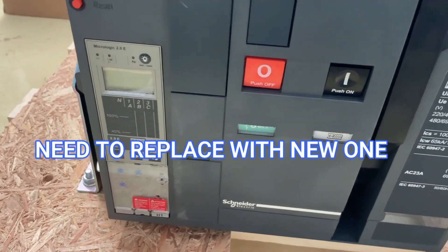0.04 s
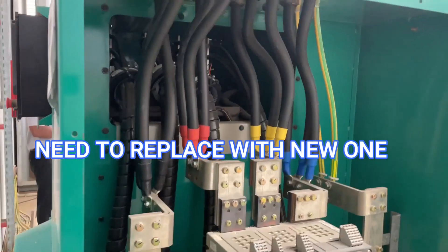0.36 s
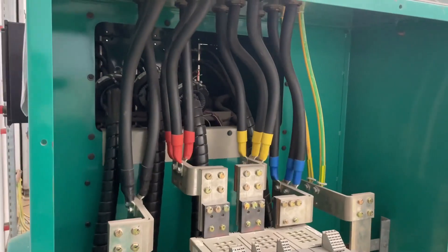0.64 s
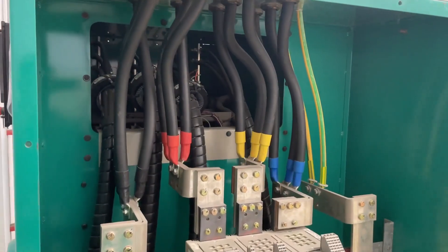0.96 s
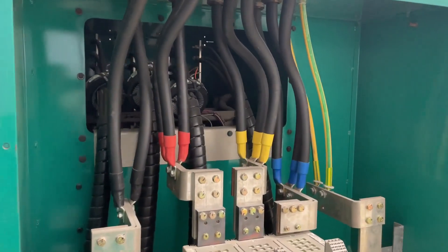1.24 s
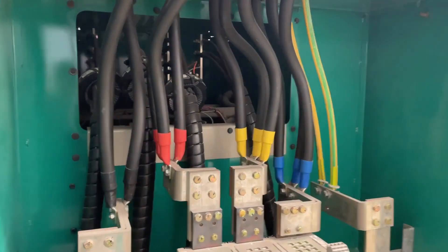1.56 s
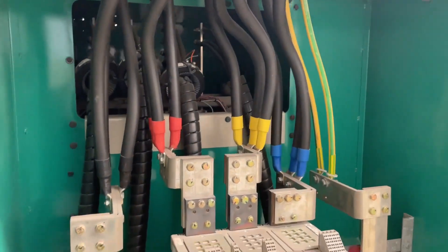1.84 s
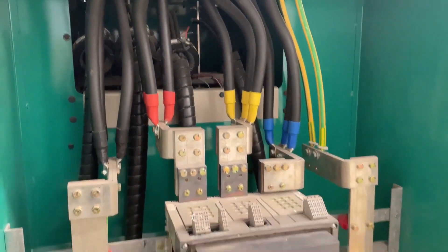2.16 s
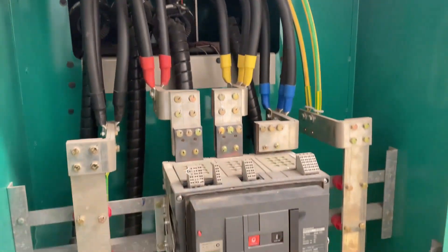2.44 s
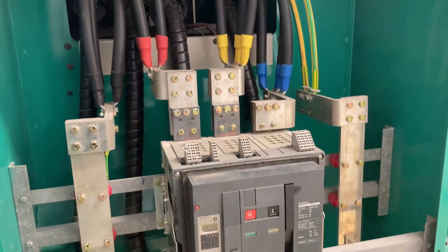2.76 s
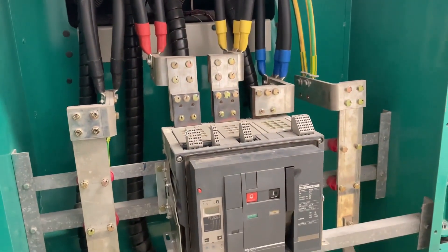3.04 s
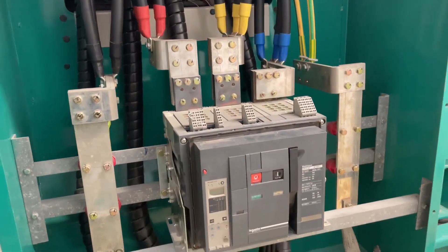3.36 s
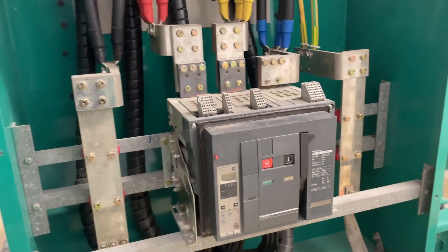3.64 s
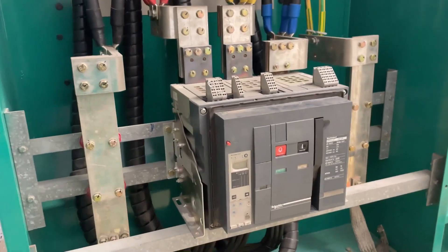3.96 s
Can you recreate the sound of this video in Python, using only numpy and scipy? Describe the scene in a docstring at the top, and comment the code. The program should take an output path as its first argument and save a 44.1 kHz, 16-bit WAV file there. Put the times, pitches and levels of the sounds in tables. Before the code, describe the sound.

A steady drone of fans and wavering motors fills an electrical room, starting after a short, hissing roar and an instant of silence. Faint rubbing swishes pass near the microphone, and a small dull knock comes late.

```python
"""An electrical switch room, with machinery droning behind it: rushing ventilation air, wavering motor tones
and a throbbing rumble. The sound opens briefly on a louder roar with a dying hiss; after a short silence the
scene changes and the drone swells in, bass last. Close to the stereo microphone, friction makes soft swishes,
as of a sleeve, and a small body gives one dull knock."""
import sys
import numpy as np
from scipy import signal
from scipy.fft import rfft, irfft
from scipy.io import wavfile

SR = 44100
rng = np.random.default_rng(int(sys.argv[2]) if len(sys.argv) > 2 else 0)


def dump(signal):
    """Clip the signal to [-1, 1] and save it as 16-bit WAV at the path in sys.argv[1]."""
    limited = np.clip(np.atleast_2d(signal).T, -1, 1)
    pcm = np.round(limited * 32767).astype(np.int16)
    wavfile.write(sys.argv[1], SR, pcm)


N = 176400
TIME = np.arange(N) / SR
HZ = np.maximum(np.arange(N // 2 + 1) * SR / N, 1)
SIDES = np.array([[.5], [-.5]])   # half to the left, minus half to the right
ROAR_END_S, ROAR_FADE_S, DRONE_START_S = 0.284, 0.0038, 0.3299


# Ventilation filling the room. Each row: frequency in Hz, relative level in dB.
AIR_SPECTRUM = [(53, -46), (90, -6.5), (128, -1.5), (169, -6), (294, -2.5), (361, -6), (459, -6.5),
                (503, -9), (542, -6), (594, -10.5), (829, -12), (1320, -16), (1680, -15.5), (2380, -19),
                (2870, -24), (6470, -37.5), (7500, -45.5), (9750, -160), (16500, -120)]
# The air at the microphone. Each row: frequency in Hz, left-right correlation.
AIR_LIKENESS = [(60, 0.84), (98, 1), (160, 0.73), (260, 0.85), (430, 0.53), (690, 0.39), (1130, 0.032),
                (1850, 0.012), (3020, 0.49), (4920, 0.48), (8030, 0.0072), (13100, 0.29)]
# Where the air sits. Each row: frequency in Hz, left minus right in dB.
AIR_BALANCE = [(60, 1.0), (130, -1.5), (280, 1), (600, 1), (1300, 0.5), (2810, 3.5), (6070, 4),
               (13100, -19)]
# Ducts and cabinet. Each row: centre in Hz, width in Hz, lift in dB.
DUCT_RESONANCES = [(264, 27, 3.5), (306, 41, 3), (834, 80, 1), (1089, 99, 5), (1646, 99, 2.5),
                   (1928, 96, 4), (2290, 310, 1.5), (3210, 210, 3), (4490, 720, 3)]

def air():
    """Fan noise through duct and cabinet resonances, fluttering slightly."""
    gain = colour(AIR_SPECTRUM) * from_db(resonances_db(DUCT_RESONANCES) + at_hz(AIR_BALANCE) * SIDES)
    level_db = -20.5 + 0.44 * drift(rate_hz=24)
    return from_db(level_db) * stereo_noise(gain, at_hz(AIR_LIKENESS))


# Motors behind the room. Each row: pitch in Hz, relative level in dB, left-right phase in radians,
# left minus right in dB.
MOTOR_TONES = [(42.7, -32.5, 0, 1), (46.7, -29.5, 0, 1), (53.7, -28, .1, 2), (70.3, -33, -.1, 0),
               (116.5, -34, .1, 0), (140.2, -34, .2, -4.5), (164, -42, .2, 1), (200.3, -37, -.1, 4),
               (231, -37.5, -.1, 3), (246.7, -34.5, -.2, 4), (292, -34, .4, .5), (330, -38, .3, 0),
               (362, -43, -.5, 3), (385, -43, .1, -2), (408, -42, .2, 3), (455, -38.5, .5, 8),
               (537, -41, -.8, 6), (1095, -48, -1.6, 0), (1121, -48, -2.4, 6)]
BASS_TOP_HZ = 80

def motors(low_hz, high_hz):
    """Motor tones of one register waver in level and phase; the lowest beat against each other."""
    out = 0
    for hz, db, apart, pan_db in MOTOR_TONES:
        if low_hz <= hz < high_hz:
            phase = 2 * np.pi * (hz * TIME + rng.random()) + 0.4 * drift(rate_hz=1)
            level_db = db - 1 + pan_db * SIDES + 1.5 * drift(rate_hz=1)
            out = out + np.sqrt(2) * from_db(level_db) * np.sin(phase + apart * SIDES)
    return out


# The machinery's deep shaking. Each row: frequency in Hz, relative level in dB.
RUMBLE_SPECTRUM = [(22, -28), (32, -18), (42, -1), (52, 1), (72, 0.5), (90, -5), (130, -32)]
# Surges of bass in the room. Each row: time in seconds, relative level in dB.
BASS_SURGES = [(.34, -39.5), (.8, -33), (.95, -27), (1.45, -26.5), (1.8, -22.5), (2.3, -24), (2.75, -25),
               (3.05, -25.5), (3.22, -21), (3.42, -24.5), (3.65, -28.5), (3.87, -21.5), (4.0, -25.5)]

def rumble():
    """Shaking and the lowest motor tones surge together, nearly alike on both sides."""
    shaking = from_db(-28 + 1.3 * SIDES) * stereo_noise(colour(RUMBLE_SPECTRUM), likeness=0.97)
    bass = shaking + motors(0, BASS_TOP_HZ)
    level_db = 2 + np.interp(TIME, *np.transpose(BASS_SURGES))
    return from_db(level_db) * bass / bass.std()


# The drone coming in. Each row: register in Hz, starting shortfall in dB, rise time in seconds.
SWELL = [(129, 11.5, 0.94), (415, 10.5, 0.43), (1500, 5, 0.48), (5000, 4, 0.43)]
# Its slow rise and fall above the bass. Each row: time in seconds, gain in dB.
DRONE_LEVEL = [(.33, 0.5), (1.0, -1.54), (1.5, -0.5), (2.2, -0.4), (2.9, 0.3), (3.4, 0.2), (3.8, 0.5),
               (4.0, 0)]

def swell(drone):
    """Each register rises to its full level in its own time."""
    out, spectrum = 0, rfft(drone)
    for hz, shortfall_db, rise_s in SWELL:
        share = at_hz([(row[0], float(row[0] == hz)) for row in SWELL])
        remaining = np.clip(1 - (TIME - DRONE_START_S) / rise_s, 0, 1)
        out = out + irfft(spectrum * share, N) * from_db(-shortfall_db * remaining)
    return out * from_db(np.interp(TIME, *np.transpose(DRONE_LEVEL)))


# The rush of the opening scene. Each row: frequency in Hz, relative level in dB.
ROAR_SPECTRUM = [(26, -33), (45, -5), (75, 0.5), (210, -5), (359, -9.5), (484, -8.5), (810, -17),
                 (1320, -15.5), (1830, -19), (5440, -36), (7500, -50), (9750, -95), (16500, -120)]
# The roar at the microphone. Each row: frequency in Hz, left-right correlation.
ROAR_LIKENESS = [(60, 1), (180, 0.7), (520, 0.36), (1520, 0.079), (4460, 0.45), (13100, -0.22)]
# Its resonances. Each row: centre in Hz, width in Hz, lift in dB.
ROAR_RESONANCES = [(123, 23, 2.5), (178, 25, 4), (319, 36, 3.5), (480, 26, 2.5), (716, 32, 7.5),
                   (960, 140, 2.5), (1366, 100, 4.5), (1630, 126, 6), (2510, 770, 4)]
# Its hum. Each row: pitch in Hz, starting level in dB.
ROAR_HUM = [(86, -20), (122, -22), (180, -22), (214, -20.5), (482, -24)]

def roar(sag_db_per_s=12.5):
    """The brief opening scene: rushing noise and a wavering hum, sagging a little."""
    gain = colour(ROAR_SPECTRUM) * from_db(resonances_db(ROAR_RESONANCES))
    out = from_db(-10) * stereo_noise(gain, at_hz(ROAR_LIKENESS))
    for hz, db in ROAR_HUM:
        phase = 2 * np.pi * (hz * TIME + rng.random()) + .6 * drift(rate_hz=11)
        out = out + np.sqrt(2) * from_db(db + drift(rate_hz=11)) * np.sin(phase)
    return from_db(-sag_db_per_s * TIME) * out


# Swishes close to the microphone. Each row: peak time in seconds, level in dB, rise in seconds,
# decay in seconds, scrape above the swish in dB.
SWISHES = [(0.005, -23, .02, 0.058, -0.5), (0.07, -30, .025, 0.03, 5.5), (0.18, -41.5, 0.035, 0.085, -1),
           (1.095, -43.5, 0.045, 0.083, 5), (1.46, -50, 0.19, .055, 8.5), (1.73, -32.5, 0.013, 0.044, 3),
           (2.5, -54.5, .07, .08, 5), (2.95, -49.5, 0.074, 0.099, 12), (3.15, -47.5, 0.064, 0.065, 5),
           (3.51, -49, .06, 0.1, 13), (3.555, -38, 0.011, 0.04, -5), (3.93, -44.3, 0.045, 0.054, 0)]
# The bright swish and the duller scrape under it. Each row: frequency in Hz, relative level in dB.
SWISH_SPECTRUM = [(3000, -18), (4500, 2.5), (6500, -1), (9000, 4), (12000, -2), (15500, -11)]
SCRAPE_SPECTRUM = [(1200, -6), (2500, 4), (4000, -2), (5800, -3), (7200, -3)]

def swishes(linger=2.2):
    """Bright friction noise over a duller, longer scrape; slow rubs are mostly scrape."""
    bright = strokes([row[:4] for row in SWISHES])
    dull = strokes([(peak_s, db + scrape_db, rise_s, decay_s * linger)
                    for peak_s, db, rise_s, decay_s, scrape_db in SWISHES])
    rub = from_db(.9 * drift(rate_hz=30))   # the friction catches and slips unevenly
    return rub * (bright * treble_noise(SWISH_SPECTRUM) + dull * treble_noise(SCRAPE_SPECTRUM))


# The knock, close by and dead centre. Each row: start in seconds, level in dB.
KNOCK_CONTACTS = [(2.8932, -12), (2.8958, -2.5)]
# The struck body. Each row: pitch in Hz, relative level in dB, seconds to fall by 60 dB.
KNOCK_MODES = [(295, -3, 0.018), (516, -4, 0.01), (773, -1, 0.022), (1300, -6, .008), (1720, -13, .012)]

def knock(attack_s=.0003):
    """Two quick, soft contacts ring a small, well damped body."""
    out = 0
    for start_s, db in KNOCK_CONTACTS:
        age = np.maximum(TIME - start_s, 0)
        push = 1 - np.exp(-(age / attack_s) ** 2)
        for hz, mode_db, t60 in KNOCK_MODES:
            ring = np.exp(-np.log(1000) * age / t60) * np.sin(2 * np.pi * hz * age)
            out = out + from_db(db + mode_db) * push * ring
    return out


# Hiss in the background. Each row: frequency in Hz, relative level in dB.
HISS_SPECTRUM = [(5000, -7), (7000, 3.5), (8500, -8), (10000, -4.5), (13000, -14.5), (15500, -9)]

def hiss():
    """Faint, steady noise in the top treble."""
    return from_db(-53.5) * treble_noise(HISS_SPECTRUM)


def from_db(db):
    """Decibels to gain."""
    return 10 ** (np.asarray(db) / 20)


def at_hz(points):
    """A table over log frequency, read at every frequency."""
    hz, value = np.transpose(points)
    return np.interp(np.log(HZ), np.log(hz), value)


def colour(points):
    """Gain of a spectrum table, falling steeply beyond its ends."""
    beyond = np.minimum(HZ / points[0][0], 1) * np.minimum(points[-1][0] / HZ, 1) ** 4
    return from_db(at_hz(points)) * beyond ** 4


def resonances_db(rows):
    """Lift in dB of a set of resonances, at every frequency."""
    return sum(db / (1 + (2 * (HZ - hz) / width) ** 2) for hz, width, db in rows)


def white():
    """Spectrum of fresh white noise."""
    return rfft(rng.standard_normal(N))


def drift(rate_hz):
    """Random wander, mostly slower than rate_hz; rms 1."""
    slow = irfft(white() / (1 + (HZ / rate_hz) ** 2), N)
    return (slow - slow.mean()) / slow.std()


def stereo_noise(gain, likeness):
    """Coloured noise, partly alike left and right; rms 1."""
    alike = np.clip(likeness, -.99, .99)
    mid, side = np.sqrt(1 + alike) * white(), np.sqrt(1 - alike) * white()
    noise = irfft(gain * np.array([mid + side, mid - side]), N)
    return noise / noise.std()


def treble_noise(spectrum, shared_from_hz=5700, in_step_hz=11500, port_lag_s=0.00015):
    """Noise at two microphone ports, its top treble out of step either side of one pitch; rms 1."""
    shared = 1 / (1 + (shared_from_hz / np.maximum(HZ, 100)) ** 40)
    turn = np.pi * (HZ - in_step_hz) * port_lag_s
    near = white() * np.sqrt(shared) * np.exp(1j * np.array([turn, -turn]))
    spread = np.sqrt((1 - shared) / 2) * (white() + np.array([white(), white()]))
    noise = irfft(colour(spectrum) * (near + spread), N)
    return noise / noise.std()


def strokes(rows):
    """Envelope of a run of strokes: each rises smoothly and dies away."""
    power = 0
    for peak_s, db, rise_s, decay_s in rows:
        age = TIME - peak_s
        shape = np.exp(-(np.minimum(age, 0) / rise_s) ** 2 - np.maximum(age, 0) / decay_s)
        power = power + (from_db(db) * shape) ** 2
    return np.sqrt(power)


def scene():
    """The brief roar of the opening scene, a short silence, then the scene changes to the drone; swishes and
    the knock in front."""
    opening = np.sin(np.pi / 2 * np.clip((ROAR_END_S - TIME) / ROAR_FADE_S, 0, 1)) ** 2
    later = TIME >= DRONE_START_S
    drone = swell(air() + motors(BASS_TOP_HZ, SR)) + rumble()
    treble = swishes() + hiss()
    return opening * (roar() + treble) + later * (drone + treble) + knock()


def record(dry):
    """Peaks stop at full scale, and the top is cut, 70 dB down from 16.7 kHz."""
    lowpass = signal.cheby2(12, 70, 16700, fs=SR, output="sos")
    return signal.sosfilt(lowpass, np.clip(dry, -1, 1))


dry = scene()
out = record(dry)
dump(out)
```